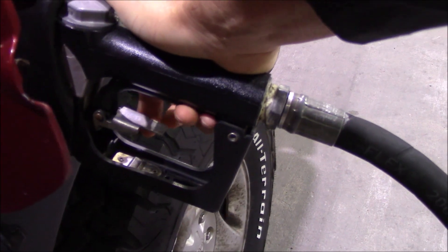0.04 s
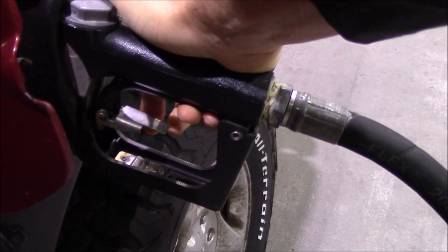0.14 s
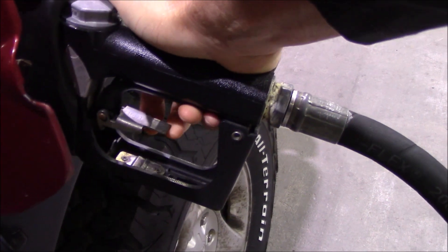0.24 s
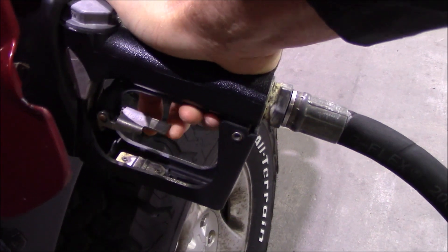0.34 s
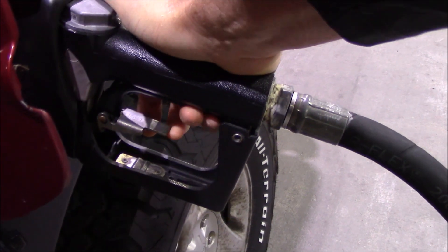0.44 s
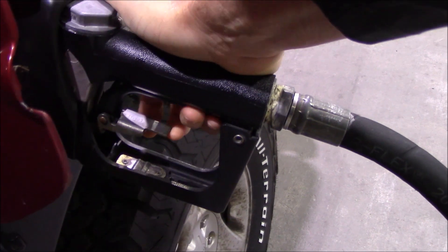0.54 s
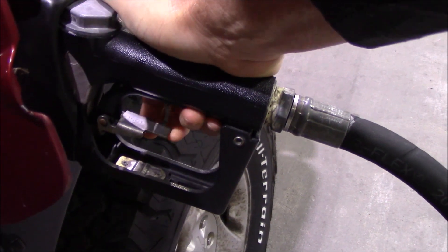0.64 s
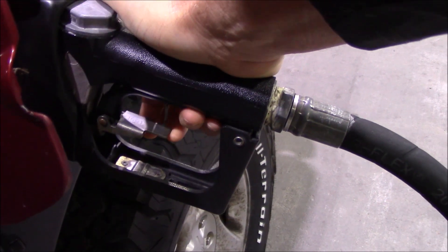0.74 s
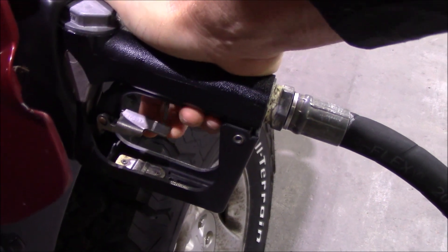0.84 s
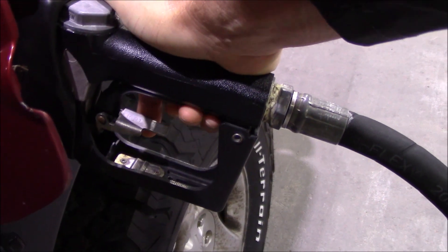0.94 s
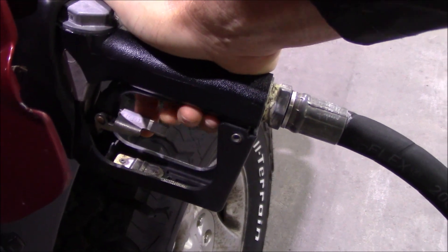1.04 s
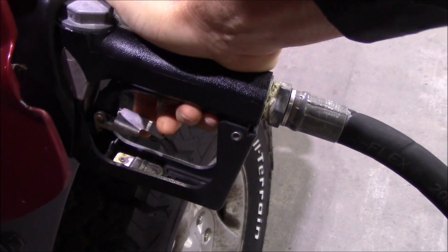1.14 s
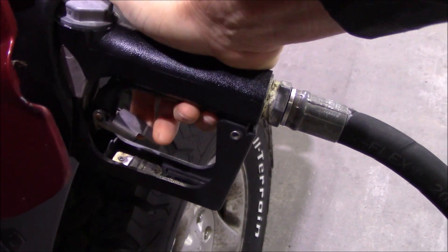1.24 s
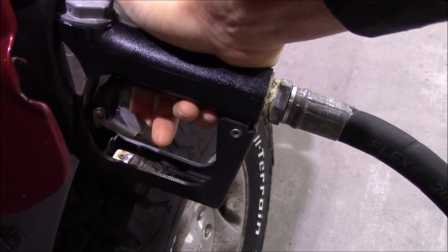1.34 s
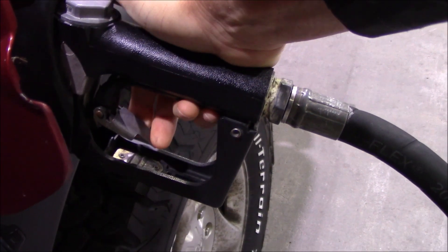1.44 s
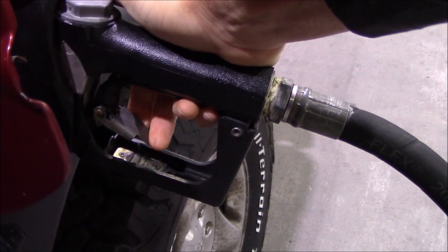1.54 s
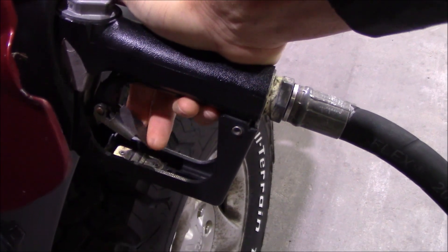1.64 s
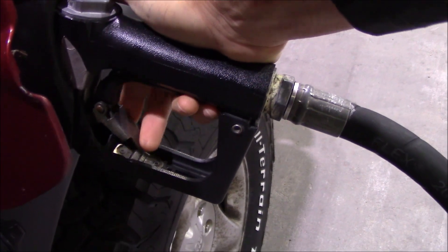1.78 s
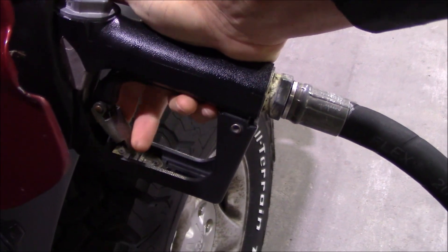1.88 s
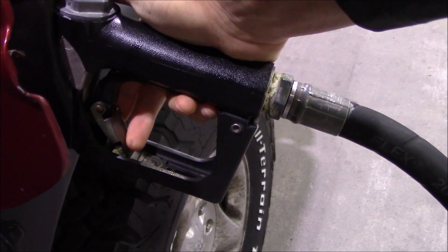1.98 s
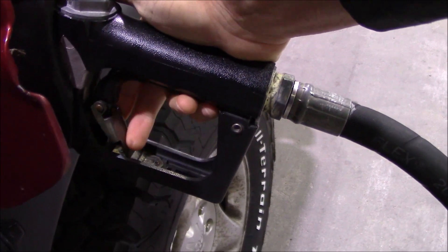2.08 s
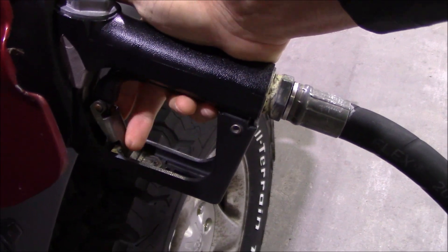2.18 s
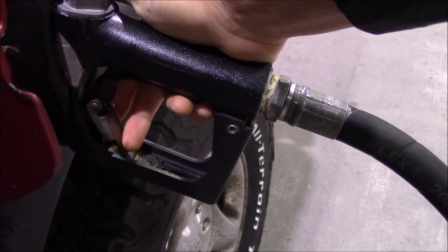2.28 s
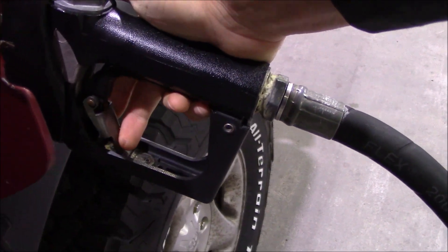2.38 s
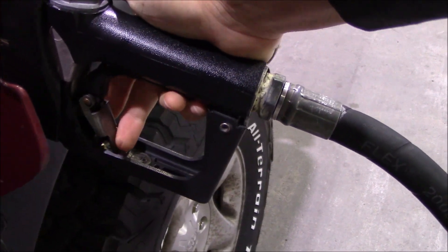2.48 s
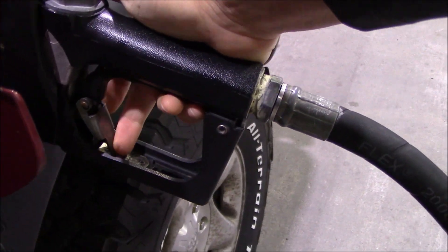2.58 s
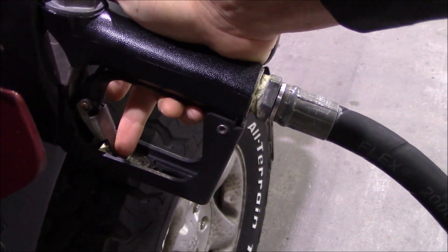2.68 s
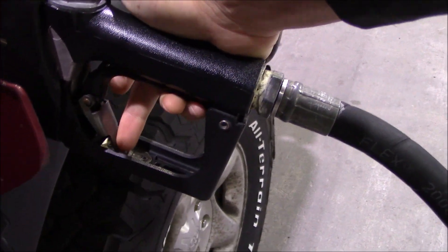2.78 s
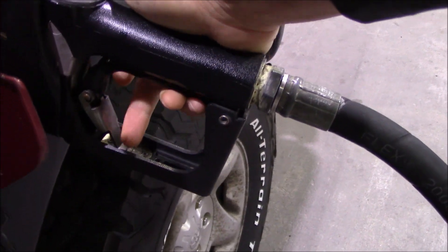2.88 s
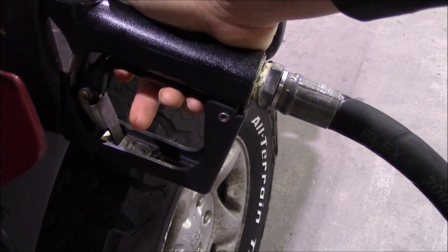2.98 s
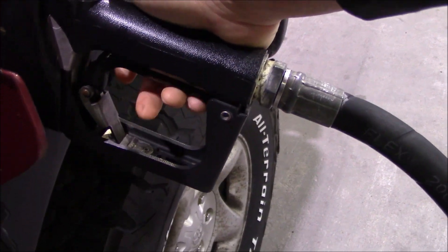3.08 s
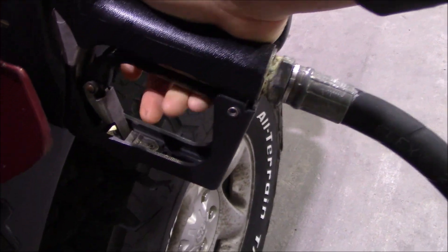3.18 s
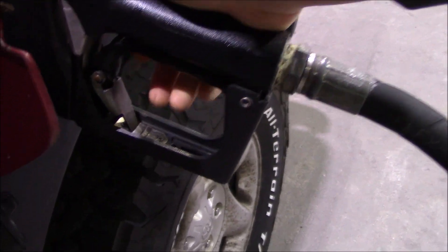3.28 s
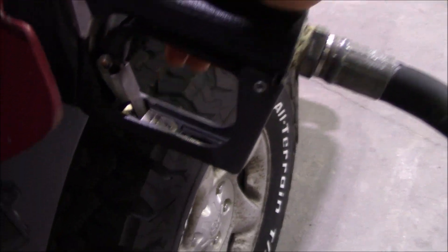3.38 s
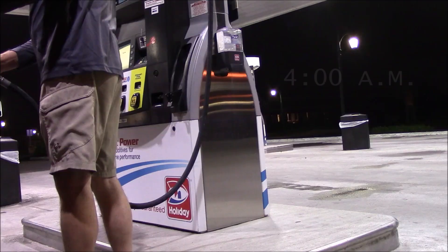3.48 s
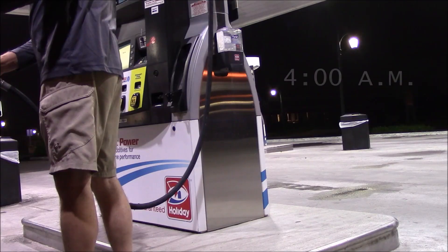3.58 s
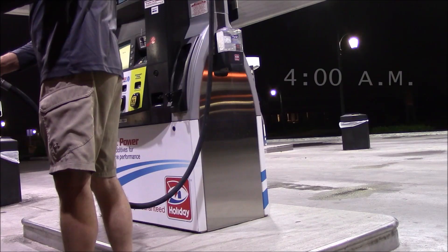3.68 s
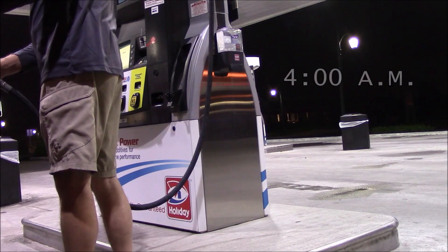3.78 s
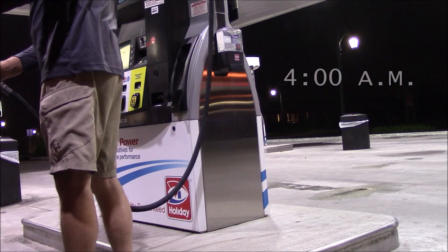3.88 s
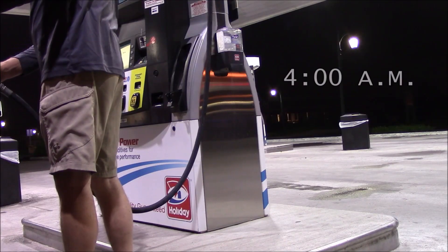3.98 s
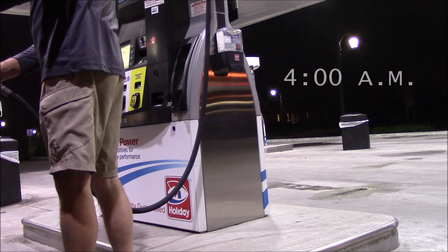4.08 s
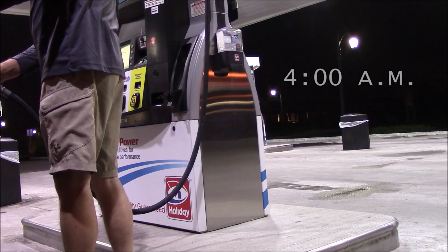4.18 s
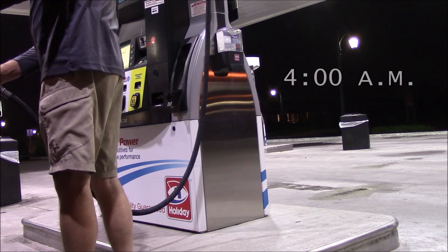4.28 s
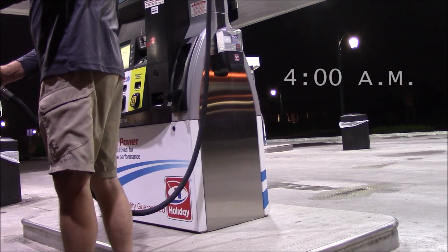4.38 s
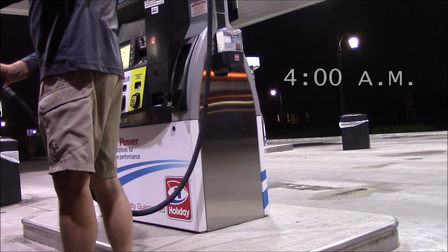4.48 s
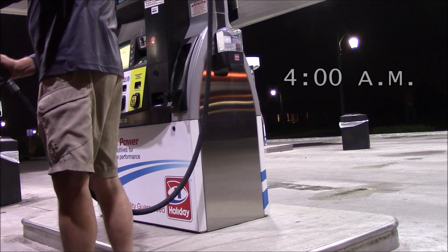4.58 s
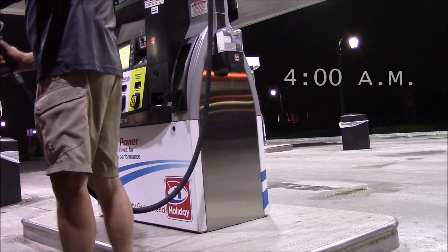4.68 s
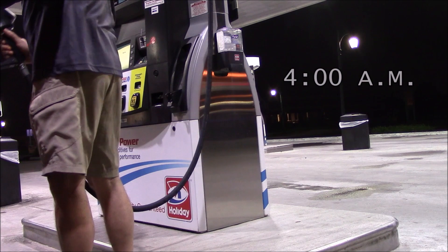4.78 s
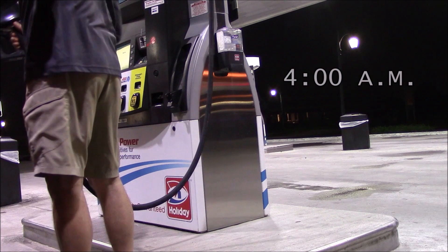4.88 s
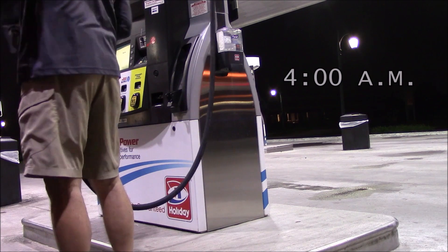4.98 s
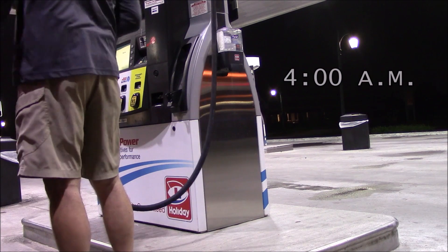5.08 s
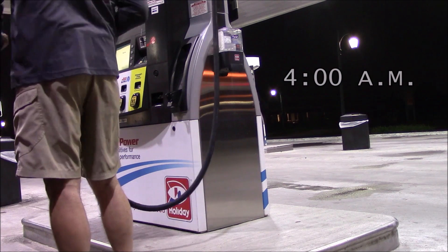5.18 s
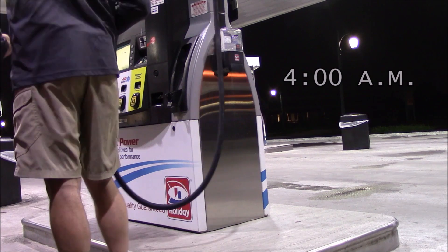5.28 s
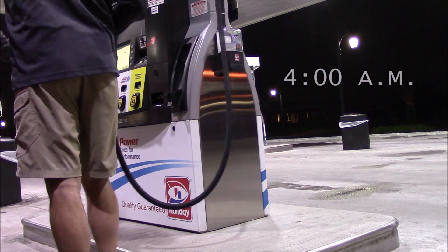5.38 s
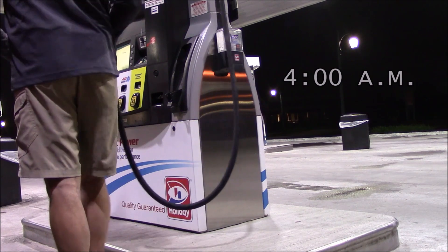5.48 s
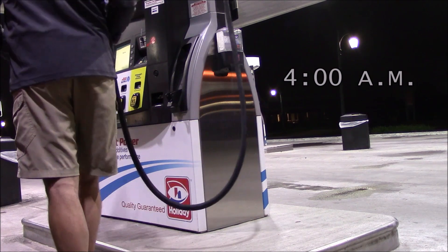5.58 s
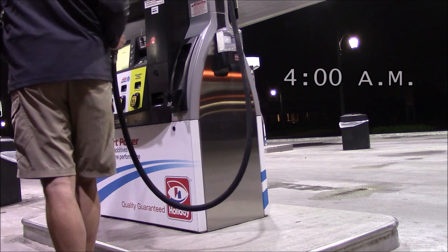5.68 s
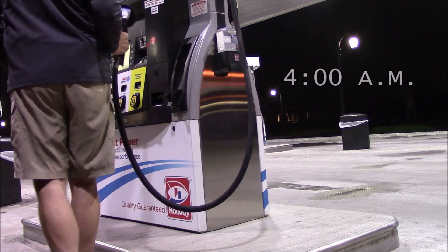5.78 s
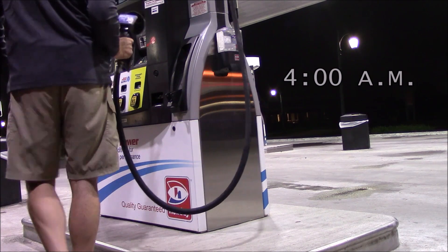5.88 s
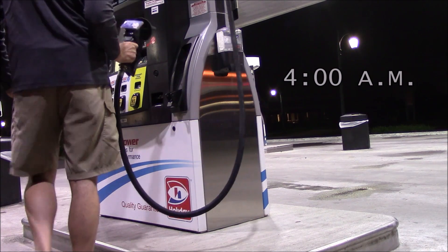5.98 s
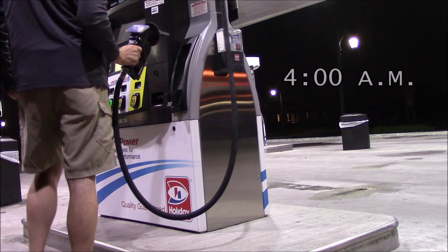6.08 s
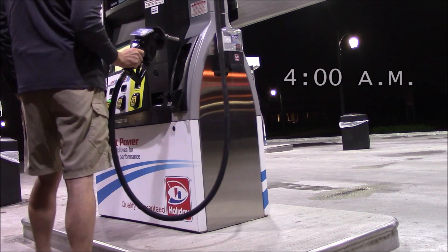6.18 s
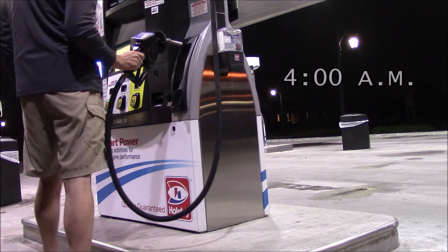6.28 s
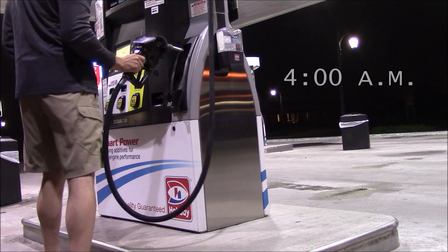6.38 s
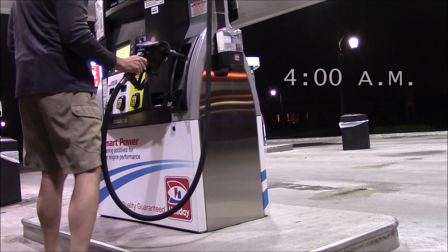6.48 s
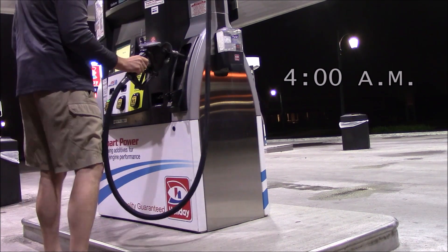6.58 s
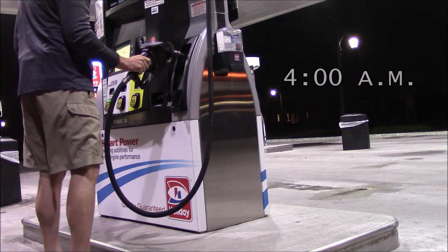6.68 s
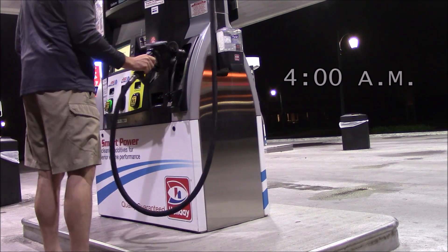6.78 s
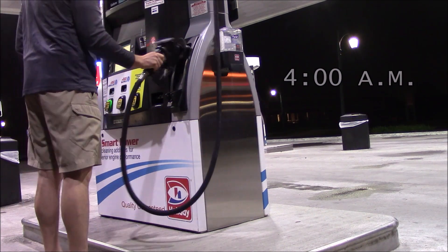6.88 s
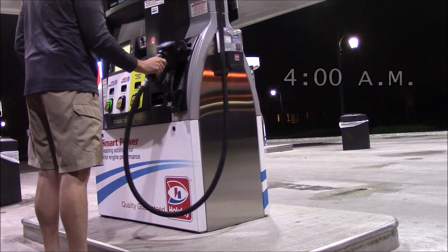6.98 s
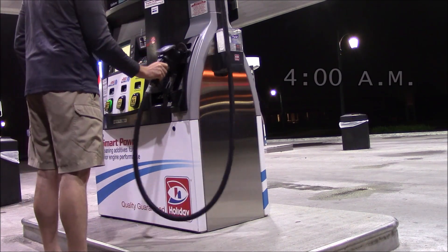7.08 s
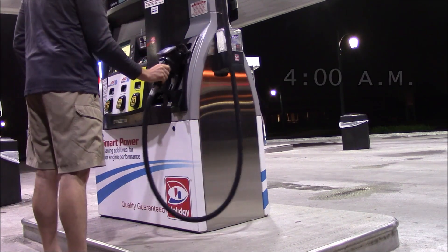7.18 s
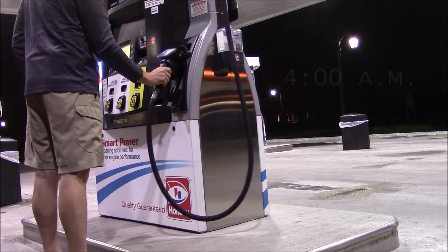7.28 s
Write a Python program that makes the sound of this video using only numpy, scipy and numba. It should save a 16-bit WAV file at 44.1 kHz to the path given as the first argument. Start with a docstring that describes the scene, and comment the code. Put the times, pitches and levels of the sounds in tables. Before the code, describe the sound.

At an outdoor filling station, a nearby stereo microphone hears liquid churning in a filler pipe, rising steadily to a brimming surge before the valve cuts it off. The handle clacks and rings, smaller knocks follow, and shoes scuff on concrete. Finally the spout squeaks against its holster and lands with several boxy thumps and rattles, with low hum and faint traffic behind.

```python
"""Filling-station forecourt: fuel rushes from a nozzle into a car's tank, bubbling in the pipe and hissing in its neck.
Ringing bubbles over filtered noise make the churn; random clicks through the neck's resonances make the spray.
The valve snaps shut and the lever clacks, as bursts of noise through a hollow shell with ringing metal.
Shoes scuff on grit, hose and clothes rub, and the nozzle scrapes and knocks into its holster.
A low machine hum and distant traffic lie behind; the stream and this background fade in while the fuel runs."""
import sys
import numpy as np
from scipy import signal
from scipy.fft import rfft, irfft, next_fast_len
from scipy.io import wavfile
from numba import njit

SR = 44100
rng = np.random.default_rng(int(sys.argv[2]) if len(sys.argv) > 2 else 0)


def dump_mix(stems):
    """Bounce the given channels to the path in sys.argv[1] as a 16-bit WAV at rate SR."""
    frames = np.atleast_2d(stems).T  # one column per channel
    limited = np.clip(frames, -1, 1)  # hard clip at full scale
    pcm = np.round(limited * 32767).astype(np.int16)
    wavfile.write(sys.argv[1], SR, pcm)


N = 323910
TIME = np.arange(N) / SR  # seconds
FREQ = np.maximum(np.fft.rfftfreq(2 * next_fast_len(N // 2 + SR // 8), 1 / SR), 1)  # Hz, kept above zero

SHUT_S, DRAIN_S = 3.514, 0.0025  # the valve shuts, and the flow dies away
OPEN_S, SQUEEZE_S, PART_OPEN_DB = 1.0, 0.2, -1  # the lever is part open until it is squeezed home
CHURN_DB, CHURN_DB_PER_S = -29.5, 1.42  # level when the valve shuts, and growth as fuel backs up the pipe
BRIM_DB, BRIM_S = 4, 0.28  # just before the cut-off, fuel wells up the neck and both get louder
SURGE_DB, SURGE_POINTS_PER_S = 0.6, 13  # the churn heaves as air escapes past the jet
SPRAY_DB = -42.5
SPATTER_DB = -12  # relative to the spray

# Spray colour. Each row: frequency in Hz, density in dB per Hz.
SPRAY_COLOUR = [(1470, 3.5), (2500, -1), (3320, -5.5), (3660, 0), (4320, -5), (4620, -1), (5290, 1.5),
                (6780, -11), (8810, -13), (10400, -21), (12400, -16), (14200, -30), (15000, -53)]
# Resonances of the filler neck. Each row: frequency in Hz, width in Hz, level in dB.
NECK_MODES = [(1640, 40, 16.5), (1817, 53, 16.5), (2020, 40, 13.5), (3820, 63, 6), (4630, 48, 10.5),
              (5200, 130, -14), (5590, 66, -26), (7060, 230, -13), (7660, 150, -12), (8760, 150, -17)]
# The spray flares when the jet shifts. Each row: peak time in seconds, length in seconds, gain in dB.
SPRAY_SPURTS = [(1.01, 0.044, 2), (1.15, 0.043, 3), (3.089, 0.0065, 5.5)]
# Spits of fuel against the neck. Each row: start in seconds, level in dB, top frequency in Hz.
FUEL_SPITS = [(1.457, -46, 7860), (2.093, -36, 5800), (2.3245, -44, 6500), (2.373, -36.5, 5760),
              (2.766, -36.5, 2370), (3.0705, -42, 6500)]
# Big bubbles that burst in the pipe. Each row: start in seconds, level in dB, pitch in Hz.
PIPE_GULPS = [(0.871, -29, 1000), (.933, -29, 990), (1.015, -25.5, 560), (1.195, -23.5, 920),
              (1.202, -25, 765), (1.312, -26.5, 997), (2.203, -15, 840), (2.442, -21, 865),
              (2.549, -19, 900), (3.38, -15, 800), (3.509, -27, 800)]


def fuel():
    """The jet surges, churns and sprays, louder as the lever opens and the pipe fills, until the valve shuts."""
    to_go = np.maximum(SHUT_S - TIME, 0)
    lever_db = PART_OPEN_DB * np.clip((OPEN_S - TIME) / SQUEEZE_S, 0, 1)
    flow_db = lever_db + BRIM_DB * np.exp(-to_go / BRIM_S)
    valve = np.exp(-np.maximum(TIME - SHUT_S, 0) / DRAIN_S)
    flutter = walk(55)  # shared by churn and spray

    churn_db = CHURN_DB - CHURN_DB_PER_S * to_go + flow_db
    churn_db = churn_db + 1.0 * flutter + SURGE_DB * walk(SURGE_POINTS_PER_S)
    liquid = (churn() * undb(churn_db) + hose()) * fade_in()

    spurt_db = sum(db * swell(s, length, 0) for s, length, db in SPRAY_SPURTS)
    spray_db = SPRAY_DB + flow_db + spurt_db + 0.6 * walk(21.7)
    drops = clicks(7000, spread_db=1.5) * undb(spray_db + 0.07 * flutter + 1.66 * walk(130)) * fade_in()
    neck = undb(-5.5) * unit(np.abs(resonances(NECK_MODES)))
    spray = colour(drops, unit(np.hypot(unit(shape(SPRAY_COLOUR)), neck)))
    pings = spatter() * undb(spray_db + SPATTER_DB) * fade_in()

    spits = sum(snaps([(s, db)], low_hz=1550, high_hz=top_hz, decay=.004) for s, db, top_hz in FUEL_SPITS)
    gulps = sum(gulp(*row) for row in PIPE_GULPS)
    return valve * (liquid + spray + pings) + spits + gulps


GURGLE_DB = -9.5  # relative to the bubble crowd, reached as the valve shuts
# Colour of the churning liquid. Each row: frequency in Hz, density in dB per Hz.
CHURN_COLOUR = [(20, -38), (54, 11), (86, -14.5), (190, -16.5), (282, -10.5), (504, 0), (634, -3),
                (1020, -5), (1460, -14), (2900, -37.5), (3770, -58), (6380, -120)]
# Resonances of the filler pipe's air column. Each row: frequency in Hz, width in Hz, level in dB.
PIPE_MODES = [(340, 22, 0.5), (490, 40, -12.5), (926, 30, -5), (1025, 38, -4.5), (1602, 22, -5.5),
              (1880, 6.7, 12), (2030, 10, -15)]


def churn(low_hz=260, high_hz=2800, cycles=11, spread_db=1.5, glide=0.025, rush_db=-2, count=9000):
    """A crowd of short bubbles over the turbulent rush of the jet; gurgles grow as the pipe fills."""
    when, pitch, life, size = rng.random((count, 4)).T
    hz = low_hz * (high_hz / low_hz) ** pitch
    strength = undb(-spread_db * np.log(np.maximum(size, .02))) * hz  # small bubbles die sooner, so start stronger
    crowd = bubbles((when * N).astype(int), hz, cycles * (.5 + life), strength, np.full(count, float(glide)))
    rush = band(rng.standard_normal(N), 96, 2000, order=2)
    filling = np.minimum(TIME / SHUT_S, 1)
    liquid = unit(crowd) + undb(GURGLE_DB) * gurgles() * filling + undb(rush_db) * unit(rush)
    pipe = shape(CHURN_COLOUR) * shape([(200, 4.8), (350, 0.64)]) * (1 + resonances(PIPE_MODES))
    return unit(colour(liquid, pipe))


def gurgles(low_hz=520, high_hz=1296, cycles=23, count=200):
    """Big pockets of air ring longer and slide up or down as they stretch."""
    when, pitch, size, slide = rng.random((count, 4)).T
    hz = low_hz * (high_hz / low_hz) ** pitch
    glide = 0.24 * (2 * slide - 1)
    return unit(bubbles((when * N).astype(int), hz, cycles * (.5 + size), undb(9 * size), glide))


def spatter(low_hz=4530, high_hz=5530, cycles=62, count=420):
    """Larger drops ping on the neck, each at its own pitch and strength."""
    when, pitch, size = rng.random((count, 3)).T
    hz = low_hz * (high_hz / low_hz) ** pitch
    return unit(bubbles((when * N).astype(int), hz, cycles * (.5 + size), size ** 2, np.zeros(count)))


@njit
def bubbles(start, hz, cycles, size, glide):
    """Each bubble or drop rings for some cycles and dies away while its pitch glides by a share."""
    out = np.zeros(N)
    for k in range(len(start)):
        length, phase = int(cycles[k] * SR / hz[k]), 0.
        for i in range(min(length, N - start[k])):
            age = i / length
            phase += 2 * np.pi * hz[k] * (1 + glide[k] * age) / SR
            out[start[k] + i] += size[k] * np.exp(-5 * age) * np.sin(phase)
    return out


def gulp(s, db, hz, decay=0.0012):
    """A bursting bubble: a sharp pop of a cycle or two."""
    t = np.maximum(TIME - s, 0)
    return undb(db) * np.exp(-t / decay) * np.sin(2 * np.pi * hz * t)


HOSE_DB, PUMP_HZ = -42, 48.75  # rumble level and rate of the pump's throb
# Colour of the flow in the hose. Each row: frequency in Hz, density in dB per Hz.
HOSE_RUMBLE = [(15, -8), (28, -21), (60, -3.5), (190, 7.5), (300, -2), (600, -22), (1500, -62)]
# The pump's throb. Each row: multiple of its rate, level in dB relative to the rumble.
PUMP_THROB = [(1, -7), (2, -8.5), (3, -14.5)]


def hose():
    """The turbulent flow rumbles in the hose and the pump throbs through it."""
    rumble = unit(colour(rng.standard_normal(N), shape(HOSE_RUMBLE)))
    throb = sum(undb(db) * unit(np.sin(2 * np.pi * k * PUMP_HZ * TIME)) * undb(1.2 * walk(3.6))
                for k, db in PUMP_THROB)
    return undb(HOSE_DB) * (rumble + throb)


# Blows of valve, lever and spout.
# Each row: start in seconds, level in dB, hardness in dB, thud in dB, decay in seconds.
NOZZLE_BLOWS = [(0.575, -34, -2.5, -55, 0.0019), (3.516, -42.5, 9, -31, 0.013),
                (3.708, -29, 0, -34.5, 0.007), (3.713, -37, 8, -40, 0.011), (3.743, -50, 4, -58, 0.0054),
                (4.148, -39.5, -2.5, -40.5, 0.023), (4.165, -37.5, -2.5, -48, 0.0077),
                (4.192, -61, -12, -53, 0.021), (4.337, -45.5, -2, -46.5, 0.014),
                (4.949, -59, -1, -76, 0.016), (4.97, -65, 1, -76, .008), (5.299, -60, 14, -70, 0.0044),
                (5.323, -46, 2, -70, 0.0022), (5.956, -43.5, 2.5, -70, 0.0028),
                (6.066, -40.5, -1, -73, 0.0048), (6.272, -40.5, 1, -68, 0.0035)]
# Hollow resonances of the nozzle's handle. Each row: frequency in Hz, width in Hz, level in dB.
HANDLE_MODES = [(550, 140, 0), (972, 19, 5), (1326, 25, 1.5), (1610, 25, -6), (2007, 57, -14),
                (2700, 80, 3.5), (3044, 110, 9), (3360, 28, -3), (4090, 37, -2), (4280, 40, -5),
                (4560, 40, -8), (5200, 120, 4), (5400, 75, -7), (6200, 45, 4)]
# The nozzle's metal, each mode a tight cluster. Each row: frequency in Hz, level in dB, 60 dB decay in seconds.
METAL_MODES = [(2680, -8, 0.49), (3010, -9, 0.36), (3470, -15, .5), (3880, -7, 0.36), (4102, -4, 0.39),
               (4400, -10, 0.38), (5150, -5, 0.51), (5620, 3, 0.35), (5950, -9, 0.35), (6200, -4, 0.16),
               (8500, -20, 0.35)]


def nozzle():
    """Valve, lever and spout blows crack through the hollow handle and ring its metal."""
    return struck(NOZZLE_BLOWS, HANDLE_MODES, METAL_MODES,
                  direct_db=-4.0, shell_db=-1.5, ring_db=-15.5, spread=0.021)


# The hose kicks as valve and lever slam.
# Each row: start in seconds, frequency in Hz, level in dB, decay in seconds.
HOSE_KICKS = [(3.522, 139, -32, 0.025), (3.588, 148, -38, 0.011), (3.718, 173, -29, 0.018)]


def hose_kicks():
    """Each slam jolts the hose into a short low tone."""
    return sum(boom(*kick) for kick in HOSE_KICKS)


# The spout's clink as it is drawn out. Each row: frequency in Hz, level in dB, decay in seconds.
CLINK_MODES = [(900, -56, .005), (1787, -49.5, 0.017), (2540, -52, 0.011)]


def spout_clink(start_s=4.948):
    """The spout clinks lightly as it is drawn out: a few modes struck together."""
    return sum(boom(start_s, *mode) for mode in CLINK_MODES)


# Knocks against the holster; each spot booms at its own pitch.
# Each row: start in seconds, level in dB, hardness in dB, thud in dB, decay in seconds,
# boom frequency in Hz, boom level in dB, boom decay in seconds.
HOLSTER_KNOCKS = [(6.320, -49, -6, -71, 0.0029, 500, -65, .015),
                  (6.342, -46, -5, -70, 0.0059, 500, -43, .015),
                  (6.509, -54, 4, -56, 0.015, 496, -57, .015),
                  (6.880, -34, -6.5, -66, 0.0068, 493, -25.5, .01),
                  (6.897, -49, -14, -63, 0.0048, 545, -33, 0.011),
                  (7.0205, -28.5, -2.5, -39.5, 0.01, 571, -25.5, 0.021),
                  (7.029, -28, 2, -42, 0.0037, 447, -35, .015),
                  (7.0513, -30.5, 4.5, -38, 0.016, 215, -20.5, 0.0082),
                  (7.053, -44, 4, -48, .004, 440, -23, .006),
                  (7.0551, -32.5, 1, -43, 0.0055, 655, -29, .012),
                  (7.074, -43, -2, -45, 0.024, 416, -31.5, 0.019),
                  (7.102, -51, -4, -52, .012, 290, -35, .015),
                  (7.138, -60, 0, -54, 0.0074, 647, -44, 0.013),
                  (7.175, -67, -7, -58, .008, 130, -33, .035),
                  (7.240, -36, -2, -43.5, 0.0077, 570, -29.5, 0.016),
                  (7.243, -33.5, 12, -49, 0.0041, 241, -25.5, 0.018),
                  (7.270, -48.5, 18, -69, .0054, 138, -45, .015),
                  (7.311, -44.5, 0, -70, 0.0084, 660, -42, .015),
                  (7.319, -49, -2, -60, 0.0037, 650, -48, .015)]
# Hollow resonances of the holster. Each row: frequency in Hz, width in Hz, level in dB.
HOLSTER_MODES = [(260, 26, -2), (494, 56, -6), (580, 190, 5), (784, 36, 0), (1130, 81, 5), (1562, 51, 5),
                 (1750, 92, 4), (2060, 230, 5.5), (2210, 140, 1), (2700, 180, 2.5), (3720, 420, -0.5),
                 (4700, 32, -5), (5370, 300, 5.5)]
# The pump cabinet's panels, each mode a loose cluster.
# Each row: frequency in Hz, level in dB, 60 dB decay in seconds.
PANEL_MODES = [(136.5, 14, 0.64), (185, 6, 0.9), (241, -7, 0.54), (413, 6, 0.29), (464, 9, 0.32),
               (645, 8.5, 0.31), (1110, 14, 0.18), (1570, 10, 0.2), (2130, 1, 0.4), (2770, 13, 0.19),
               (4400, 5, 0.29), (5230, 3, 0.42)]


def holster():
    """The nozzle knocks the hollow holster, its panels ring and each struck spot booms."""
    knocks = struck(HOLSTER_KNOCKS, HOLSTER_MODES, PANEL_MODES,
                    direct_db=-4.5, shell_db=-3, ring_db=-14.5, spread=0.12)
    return knocks + sum(boom(s, hz, db, decay) for s, *_, hz, db, decay in HOLSTER_KNOCKS)


SPOT_DB = 2  # each blow lands on another spot and so favours other resonances


def struck(blows, shell, modes, direct_db, shell_db, ring_db, spread):
    """Each blow excites its own mix of shell resonances; the heavier its thud, the more the modes ring."""
    out = np.zeros(2 * N)
    for s, db, hardness_db, thud_db, decay, *_ in blows:
        crack = blow(db, hardness_db, thud_db, decay)
        size, start = len(crack), int(s * SR)
        spot = [(hz, width, mode_db + SPOT_DB * rng.uniform(-0.66, 1)) for hz, width, mode_db in shell]
        f = np.maximum(np.fft.rfftfreq(size, 1 / SR), 1)
        response = undb(direct_db) + undb(shell_db) * resonances(spot, f)
        ring = undb(thud_db + ring_db) * ringing(modes, TIME[:size], spread)
        out[start:start + size] += irfft(rfft(crack) * response) + ring
    return out[:N]


RATTLE_PER_S, RATTLE_DB = 700, -3  # taps of loose parts, and the share they grow to
# a harder contact trades the low knock for a high tick and raises the knock's pitch
TICK_DB, TICK_PER_HARDNESS = -9.5, 1
KNOCK_TOP_HZ, KNOCK_OCT_PER_DB = 1980, .07  # top at hardness 0, and its rise


def blow(db, hardness_db, thud_db, decay, thud_s=0.078, rattle_db=-17, rattle_s=0.04, chatter_db=3,
         size=SR // 2):
    """One impact: a short crack, loose parts chattering (only briefly if it decays fast) and a slower thud."""
    t = TIME[:size]
    thud, *contact = rng.standard_normal((4, size))
    taps = unit((rng.random(size) < RATTLE_PER_S / SR) * rng.choice([-1, 1], size))
    loose = min(undb(RATTLE_DB), 1) * np.minimum(t / rattle_s, 1)  # taps gradually replace the noise
    knock, clank, tick = np.sqrt(1 - loose) * np.array(contact) + np.sqrt(loose) * taps

    rattle = undb(rattle_db) * np.exp(-t / (rattle_s * min(decay / 0.01, 1)))
    crack = (np.exp(-t / decay) + rattle) * (1 - np.exp(-t / 0.0003))
    crack = crack * undb(chatter_db * walk(326)[:size] * np.minimum(t / 0.0085, 1))

    knock_top_hz = KNOCK_TOP_HZ * 2 ** (KNOCK_OCT_PER_DB * hardness_db)
    knock = undb(-hardness_db) * unit(band(knock, 290, knock_top_hz))
    clank = unit(band(clank, 2190, 5870, order=4))
    tick = undb(TICK_DB + TICK_PER_HARDNESS * hardness_db) * unit(band(tick, 4700, 10300, order=2))
    body = undb(db) * crack * (knock + clank + tick)
    thud = unit(band(thud, 56, 220, order=2)) * np.exp(-t / thud_s) * (1 - np.exp(-t / 0.0047))
    return body + undb(thud_db) * thud


RING_RISE_CYCLES = 5  # a mode takes some cycles to build, so the lows come late
# Countless weaker modes. Each row: frequency in Hz, density in dB per Hz.
WASH_COLOUR = [(400, -19), (900, -1), (3500, -4.5), (6000, -5), (7500, -13), (12000, -16), (15000, -34)]


def ringing(modes, t, spread, wash_db=-1, wash_t60=0.49):
    """Each cluster of close modes rings as a restless band and dies away over a wash of weaker ones."""
    f = np.fft.rfftfreq(len(t), 1 / SR)
    noise, weak = rfft(rng.standard_normal((2, len(t))))
    clusters = 0
    for hz, db, t60 in modes:
        cluster = unit(irfft(noise / (1 + ((f / hz - 1) / spread) ** 4)))
        rise = 1 - np.exp(-t * hz / RING_RISE_CYCLES)
        clusters = clusters + cluster * undb(db - 60 * t / t60) * rise
    wash = unit(irfft(weak * np.interp(f, FREQ, shape(WASH_COLOUR)))) * undb(wash_db - 60 * t / wash_t60)
    return clusters / np.sqrt(2) + wash


def boom(s, hz, db, decay, rise_s=0.0013):
    """A struck spot flexes at one pitch and dies away."""
    t = np.maximum(TIME - s, 0)
    return undb(db) * (1 - np.exp(-t / rise_s)) * np.exp(-t / decay) * np.sin(2 * np.pi * hz * t)


SING_HOLD, HISS_HOLD = 1.04, 0.52  # singing and hiss last this share of a stroke
SING_BEND = 0.063  # pressure bends the pitch up by a share
OVERTONE_RATIO, OVERTONE_DB = 1.465, -11  # the spout's second singing mode
# The spout slides along the holster's edge. Each row: peak time in seconds, length in seconds,
# grating in dB, hiss in dB, singing pitch in Hz, singing in dB.
SPOUT_SCRAPES = [(6.383, 0.025, -33.5, -34.5, 1600, -36.5), (6.43, 0.023, -63, -75, 1440, -49),
                 (6.615, 0.037, -49, -73, 1790, -42.5), (6.805, 0.017, -29, -48, 1726, -33)]
# Colour of the grating. Each row: frequency in Hz, density in dB per Hz.
GRATE_COLOUR = [(300, -17), (600, -4.5), (1400, -4), (1700, -1), (1950, -10), (2350, -10), (5350, -7),
                (6400, -18), (8600, -15), (12900, -22), (15000, -30)]
# Colour of the hiss. Each row: frequency in Hz, density in dB per Hz.
HISS_COLOUR = [(5500, -17), (7200, -1), (8800, -2), (11000, -7), (13500, -7), (15000, -24)]
# Resonances of the spout's tube, heard in rubbing too. Each row: frequency in Hz, width in Hz, level in dB.
TUBE_MODES = [(840, 40, -6), (1290, 38, -1), (2110, 45, -5), (2330, 49, 8), (2870, 45, 2), (3750, 90, -5)]


def spout_scrapes():
    """The spout grates in uneven catches, hisses where pressed hardest and sings in two pressure-bent modes."""
    catches = clicks(2200, spread_db=1.0) * undb(2.6 * walk(170))
    grate = unit(colour(catches, shape(GRATE_COLOUR) * (1 + resonances(TUBE_MODES))))
    hiss = unit(colour(catches, shape(HISS_COLOUR)))
    # uneven strength and wandering phase for each singing mode
    waver, upper = (unit(1 + .5 * walk(150)) * np.exp(1j * 2.0 * walk(290)) for _ in range(2))
    out = 0
    for s, length, grate_db, hiss_db, sing_hz, sing_db in SPOUT_SCRAPES:
        bent_hz = sing_hz * (1 + SING_BEND * (swell(s, length, 0) - .75))
        phase = 2 * np.pi * np.cumsum(bent_hz) / SR
        overtone = undb(OVERTONE_DB) * upper * np.exp(1j * OVERTONE_RATIO * phase)
        sing = unit((waver * np.exp(1j * phase) + overtone).real)
        out = out + grate * swell(s, length, grate_db)
        out = out + hiss * swell(s, length * HISS_HOLD, hiss_db)
        out = out + sing * swell(s, length * SING_HOLD, sing_db)
    return out


# Shoe scuffs. Each row: peak time in seconds, length in seconds, level in dB, relative grit treble in dB.
SHOE_SCUFFS = [(5.371, 0.0086, -50, -13), (5.391, 0.015, -45, -11.5), (5.427, 0.026, -49, -14),
               (5.658, 0.011, -51.5, -8), (5.717, 0.032, -44.5, -11.5), (5.905, 0.036, -52, -12),
               (6.02, 0.034, -54, -11), (6.064, 0.019, -44, -12), (6.355, 0.021, -39.5, -10),
               (6.78, 0.0065, -33, -6), (6.842, 0.025, -38, -8)]
# Colour of sole on concrete. Each row: frequency in Hz, density in dB per Hz.
SOLE_COLOUR = [(290, -31), (500, -13), (1410, -11.5), (1700, -6), (1960, -7.5), (6390, -13), (8610, -6.5),
               (15000, -14.5)]
# Rasping resonances of a sole. Each row: frequency in Hz, width in Hz, level in dB.
RASP_MODES = [(527, 89, -23), (850, 46, -21), (1300, 47, 3), (1580, 62, -4), (1740, 40, -6),
              (2400, 190, -22), (4970, 1200, -31)]
# Single grains of grit that snap under a sole. Each row: start in seconds, level in dB.
GRIT_SNAPS = [(5.255, -56), (5.387, -57), (6.535, -47), (6.852, -41), (6.883, -39), (6.922, -53),
              (7.145, -64)]


def shoes():
    """Grit catches and crunches under a sole as each step presses and lifts; single grains snap."""
    stick_slip = clicks(1500, spread_db=1.2) * undb(2.6 * walk(200))
    grit = unit(colour(stick_slip, shape(SOLE_COLOUR) * (1 + resonances(RASP_MODES))))
    treble = colour(grit, shape([(5500, -40), (6800, 0)]))
    press = sum(swell(*stroke) for *stroke, treble_db in SHOE_SCUFFS)
    sharp = sum(swell(*stroke) * undb(treble_db) for *stroke, treble_db in SHOE_SCUFFS)
    grains = snaps(GRIT_SNAPS, low_hz=4500, high_hz=13000, decay=0.002)
    return (grit - treble) * press + treble * sharp + grains


# Hose and clothes rubbing. Each row: peak time in seconds, length in seconds, level in dB.
RUB_STROKES = [(5.295, 0.1, -67), (5.426, 0.037, -63), (5.877, 0.095, -59.5), (6.006, 0.028, -45),
               (6.457, 0.12, -60), (6.56, 0.024, -47), (6.615, 0.032, -38.5)]
# Colour of the rubbing. Each row: frequency in Hz, density in dB per Hz.
RUB_COLOUR = [(820, -7), (1400, -9), (1720, 0), (2020, -7), (2490, -6), (4740, -2.5), (5190, -1),
              (7130, -15.5), (13900, -24.5), (15000, -34)]


def rubbing():
    """Hose and clothes drag on the nozzle in fine, uneven catches as it is carried over."""
    catches = clicks(1800, spread_db=-2.0) * undb(2.2 * walk(160))
    drag = unit(colour(catches, shape(RUB_COLOUR) * (1 + resonances(TUBE_MODES))))
    return drag * sum(swell(*stroke) for stroke in RUB_STROKES)


WHISTLE_HZ, WHISTLE_DB = 7890, -86  # a thin electrical whistle
# Background levels, joined by straight lines. Each row: time in seconds, hum in dB, traffic in dB.
FORECOURT_LEVELS = [(3.4, -49, -59), (3.9, -50, -55), (6, -46, -47), (6.8, -42.5, -43.5), (7.34, -52, -46)]
# Machine hum. Each row: frequency in Hz, relative level in dB, waver in dB, phase wander in radians.
HUM_TONES = [(58.6, -1, 1, .04), (120.3, -9.5, 4, 0.65)]
# Colour of distant traffic. Each row: frequency in Hz, density in dB per Hz.
TRAFFIC_COLOUR = [(12, -64), (20, -36), (44, -4), (68, -6), (85, -8.5), (119, -7), (215, -10.5), (268, -11),
                  (524, -23), (674, -19.5), (942, -25), (1650, -27.5), (1790, -31.5), (2800, -36),
                  (15800, -51)]
# Drones and thin whines in the traffic's murmur. Each row: frequency in Hz, width in Hz, level in dB.
WHINE_MODES = [(123.7, 7.9, 1), (201, 9.7, -8.5), (256, 24, -10.5), (1670, 97, -15), (2740, 6.4, 14)]


def forecourt():
    """Wavering machine hum and whistle, and far traffic that reaches the ports from all sides."""
    hum_db, traffic_db = curves(FORECOURT_LEVELS)
    hum = 0
    for hz, db, waver, wander in HUM_TONES:
        tone = unit(np.sin(2 * np.pi * hz * TIME + wander * walk(9.6)))
        hum = hum + undb(db + waver * walk(11.0)) * tone
    air = shape(TRAFFIC_COLOUR) * shape([(35, 6.0), (58, -10.5), (85, 3.5)]) * (1 + resonances(WHINE_MODES))
    mid, side = (unit(colour(rng.standard_normal(N), air)) * undb(traffic_db + 0.66 * walk(6.8))
                 for _ in range(2))
    side = colour(side, shape([(150, -18.5), (700, -11.0), (2500, -2.0)]))  # the lows stay central
    whistle = undb(WHISTLE_DB) * unit(np.sin(2 * np.pi * WHISTLE_HZ * TIME + 5 * walk(25)))
    return fade_in() * (undb(hum_db) * hum + whistle + mid + side * np.array([[1], [-1]]))


def fade_in(start_db=-50, fade_s=2.9, power=1.265):
    """Gain that grows from near silence to full level as a power of time."""
    return undb(start_db) + np.minimum(TIME / fade_s, 1) ** power


def echoes(x, t60, delay):
    """A diffuse tail of unit energy that starts after a delay."""
    t = TIME[:SR]
    tail = rng.standard_normal(SR) * undb(-60 * t / t60) * (t >= delay)
    return signal.fftconvolve(x, tail / np.linalg.norm(tail))[:N]


def swell(s, length, db, release=1.25):
    """Pressure of one stroke: it builds to a peak and lets go, its fall longer than its rise."""
    out, near = np.zeros(N), np.abs(TIME - s) < 4 * length
    t = TIME[near] - s
    out[near] = undb(db) * np.exp(-np.abs(t / np.where(t < 0, length, length * release)) ** 2.15)
    return out


def snaps(table, low_hz, high_hz, decay):
    """Tiny sharp bursts of noise, one for each row of seconds and dB."""
    envelope = sum(undb(db) * (TIME >= s) * np.exp(-np.abs(TIME - s) / decay) for s, db in table)
    return envelope * unit(band(rng.standard_normal(N), low_hz, high_hz, order=2))


def clicks(rate, spread_db):
    """Random clicks per second; a positive spread makes a few much larger, a negative one a few weaker."""
    size = undb(spread_db * np.minimum(rng.exponential(size=N), 4))
    return unit((rng.random(N) < rate / SR) * size * rng.choice([-1, 1], N))


def walk(rate):
    """Random points, so many per second, joined by straight lines; spread near 1."""
    points = rng.standard_normal(N // 100)
    return np.interp(TIME * rate, np.arange(len(points)), points)


def curves(table):
    """The columns of a table, joined by straight lines in time."""
    s, *columns = np.transpose(table)
    return [np.interp(TIME, s, c) for c in columns]


def shape(points, axis=1):
    """Gain at every frequency from rows of Hz and dB."""
    points = np.array(points)
    return undb(np.interp(np.log(FREQ), np.log(points[:, 0]), points[:, axis]))


def resonances(modes, f=FREQ):
    """Summed response of resonances given as frequency, width and dB."""
    return sum(undb(db) / (1 + 1j * (f ** 2 - hz ** 2) / (f * width)) for hz, width, db in modes)


def colour(x, response):
    """Pass a sound through a frequency response, with room for its tail."""
    return irfft(rfft(x, 2 * (len(FREQ) - 1)) * response)[..., :N]


def band(x, low_hz, high_hz, order=3):
    """Causal band-pass."""
    edges = [low_hz, min(high_hz, SR / 2 - 1)]
    return signal.sosfilt(signal.butter(order, edges, "band", fs=SR, output="sos"), x)


def undb(db):
    """Decibels to gain."""
    return 10 ** (np.asarray(db) / 20)


def unit(x):
    """Scale to rms 1."""
    return x / np.sqrt(np.mean(x ** 2) + 1e-30)


# The two microphone ports. Each row: frequency in Hz, side level in dB, left minus right in dB.
PORT_COLOUR = [(60, -41, 2.5), (204, -17, 1.5), (454, -13, -1.5), (1270, -12, -2.5), (2340, -3.5, -2.5),
               (5300, -8, -3), (9500, 0.5, -1.5), (15000, -14, 0.5)]


def scene():
    """Near surfaces make the two ports differ; the canopy adds a diffuse tail."""
    near = fuel() + nozzle() + hose_kicks() + spout_clink() + holster() + spout_scrapes() + shoes() + rubbing()
    side = colour(echoes(near, t60=.12, delay=.0003), shape(PORT_COLOUR))
    # the canopy's colour takes 6 to 9 dB, most in the lows, and its mix gain a further 16 dB
    reflected = colour(near, shape([(200, -9.0), (700, -8.5), (5000, -8.0), (12000, -6)]))
    canopy = np.array([echoes(reflected, t60=0.34, delay=0.023) for _ in range(2)])
    return near + side * np.array([[1], [-1]]) + undb(-16) * canopy + forecourt()


def record(dry, ceiling=0.32, top_hz=15500):
    """The ports differ a little in colour; the loudest peaks are rounded and the top is cut."""
    balance = np.sqrt(shape(PORT_COLOUR, axis=2))
    heard = ceiling * np.tanh(colour(dry, np.array([balance, 1 / balance])) / ceiling)
    return signal.sosfilt(signal.ellip(10, .2, 80, top_hz, fs=SR, output="sos"), heard)


dry = scene()
out = record(dry)
dump_mix(out)
```